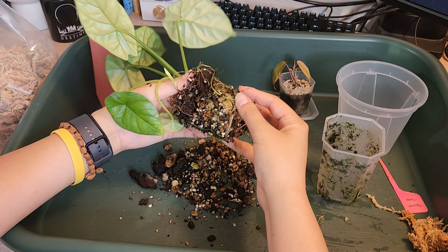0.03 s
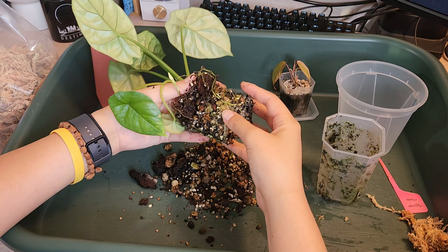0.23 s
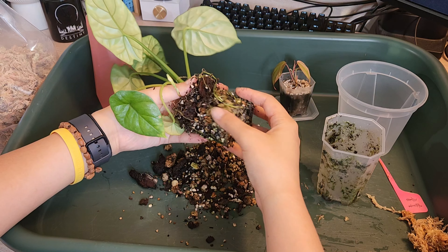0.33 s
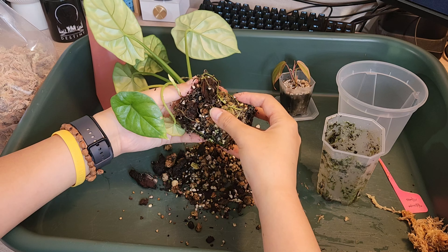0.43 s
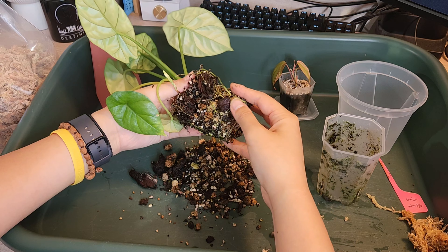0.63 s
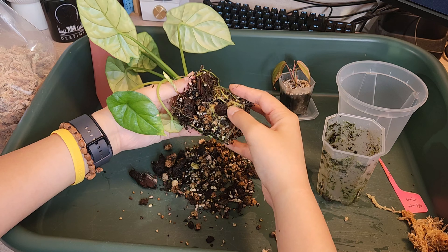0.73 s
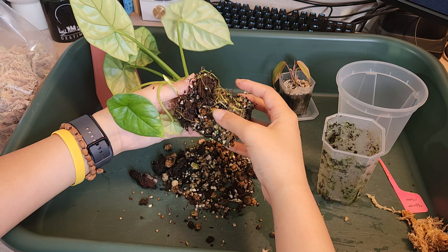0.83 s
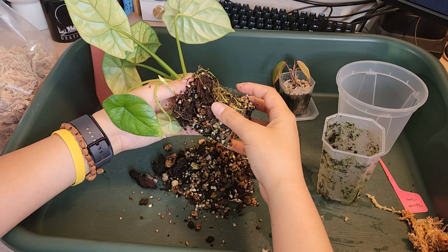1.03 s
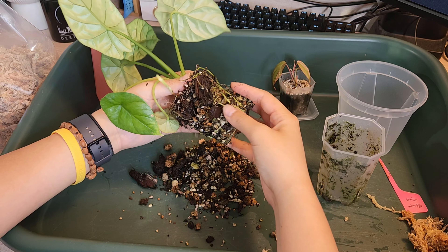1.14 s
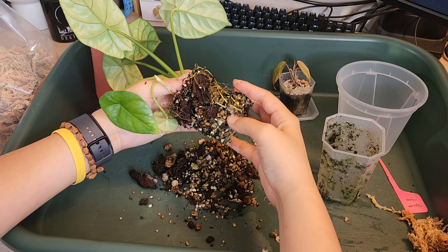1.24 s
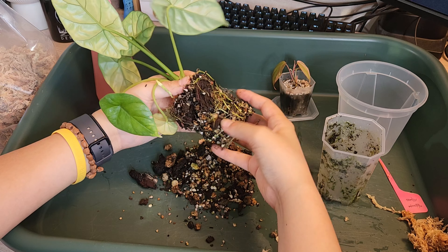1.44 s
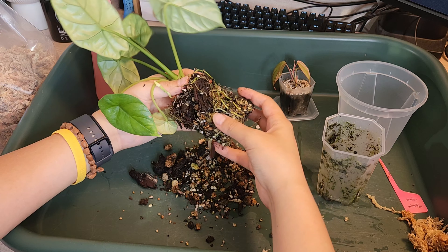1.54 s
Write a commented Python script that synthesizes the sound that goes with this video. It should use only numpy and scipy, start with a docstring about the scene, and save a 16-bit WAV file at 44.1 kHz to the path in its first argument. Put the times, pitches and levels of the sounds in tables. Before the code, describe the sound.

A quick spill of potting mix crumbs raps a plastic tub indoors, over faint room hum

```python
"""Loosening a root ball over a plastic tub.

Fingers loosen a houseplant's root ball: bits of bark and grit land as short noise bursts with pitches.
Decaying sines make the tub's walls ring and its bottom thump; decaying noise makes the small room's tail.
Grainy noise rustles as roots; shaped noise and sines give low handling, room rumble, hiss and hum."""
import sys
import numpy as np
from scipy import signal
from scipy.fft import rfft, irfft
from scipy.io import wavfile

SR = 44100
rng = np.random.default_rng(int(sys.argv[2]) if len(sys.argv) > 2 else 0)


def inscribe(sig):
    """Save sig as 16-bit PCM at rate SR to the path in sys.argv[1].

    A 1-D sig is mono; a 2-D sig holds one channel per row.
    Samples are clipped to [-1, 1] before scaling.
    """
    pcm = np.round(np.clip(np.atleast_2d(sig).T, -1, 1) * 32767)
    wavfile.write(sys.argv[1], SR, pcm.astype(np.int16))


N = 70560
TIME = np.arange(N) / SR

# bits of potting mix landing: (time [s], level [dB], extra body [dB], extra treble [dB], burst decay [s],
# own pitch [Hz], its peak [dB], second pitch [Hz], its peak [dB], left minus right [dB])
LANDINGS = [(0.1376, -35, -5, -1.5, 0.0043, 1487, 20, 6260, 3, 1.5),
            (0.1407, -40.5, 10, -7, 0.0042, 567, 14, 800, 6, 0.5),
            (0.1767, -25.5, -14.5, -8, .0034, 1540, 10, 5270, 5, 0.5),
            (0.2009, -28, -15, -4, 0.0052, 3330, 8.5, 1900, 11, 2.5),
            (0.234, -6.5, -16.5, 2, 0.0019, 1620, 14, 3870, 1.5, 2.5),
            (0.2371, -10.5, -6.5, -23, 0.0054, 1620, -16, 1230, 7, -2),
            (0.2524, -19, 8.5, -8, .0018, 1007, 5, 757, 3, -5),
            (0.2541, -10.5, 1.5, -2, 0.0029, 989, 10.5, 5317, 3, 0),
            (0.2581, -19, 3, 2, 0.0013, 962, 6.5, 1450, 6, -2),
            (0.2736, -2.5, -18.5, -6, .0016, 6200, 6, 1762, 7, -0.5),
            (0.2805, -22.5, 0, 10, .003, 1716, 11.5, 4180, 6, -1.5),
            (0.2891, -26.5, 3.5, 2, .005, 2072, 13.5, 1063, 5, -8),
            (0.3272, -12, -11.5, -14, 0.0051, 1530, 9.5, 3150, 2.5, 4.5),
            (0.3316, -28.5, -6, -14, 0.0071, 1625, 14, 2100, 14, -14),
            (0.3345, -24.5, 10.5, -24, 0.0043, 748, 4.5, 910, 3.5, -7),
            (0.3422, -44, 5, -24, 0.0045, 1690, 13, 1240, 14, -1),
            (0.3857, -14.5, -8.5, -12, 0.0044, 7260, 6.5, 1440, 6, 0.5),
            (0.498, -46.5, 11, -16, .006, 1400, 7, 940, 9, 1),
            (0.5088, -45.5, 9, -11, 0.014, 1250, 19, 1570, 11, -3),
            (0.522, -43, 6, 6, 0.0061, 14100, 13, 5500, -5, 1),
            (0.5365, -38, 3, -30, 0.016, 969, 4, 3800, 2, -1),
            (0.5651, -40.5, 3.5, -20, .008, 1550, 9, 1010, 5, -1),
            (0.593, -49, 5, -13, .006, 1480, 13, 2100, 10, 0),
            (0.616, -31, -3, -18, 0.0032, 1950, 5, 5600, 6, 0),
            (0.773, -60, -5, -1.5, .002, 4640, 12, 7500, 6.5, 6),
            (1.208, -64, -12, 14.5, .0026, 10290, 18, 7800, 8.5, 0.5),
            (1.3004, -48.5, -2.5, 5.5, 0.0032, 1940, 13, 600, 9.5, 7),
            (1.3026, -45.5, 1.5, 1.5, .005, 1896, 12.5, 1150, 9, -5),
            (1.3078, -38, -3, -5, .004, 1170, 10, 2005, 6, 4),
            (1.519, -56, 1.5, 12, 0.0055, 7000, 10, 4800, 4.5, 1.5),
            (1.526, -56, 31, -6.5, 0.0033, 1640, 10, 680, 10.5, 1.5),
            (1.530, -53, 25, -13.5, .005, 363, 12.5, 525, 11, 7)]
# left-right correlation of the noises: (frequency [Hz], correlation [-1..1])
LIKENESS_BY_HZ = [(50, 0.99), (160, 0.94), (380, 0.81), (950, 0.44), (1600, 0.23), (2400, 0.028),
                  (6000, 0.31)]
# the tub lies a little to the left: (frequency [Hz], left minus right [dB])
TUB_LEAN = [(100, -3), (450, 5.5), (770, 6.5), (1200, 2), (2700, -1), (4200, 1), (6400, 4.5), (9800, -2),
            (15000, 3)]


def from_db(db):
    """Decibels to amplitude gain."""
    return 10 ** (np.asarray(db) / 20)


def rms_one(x):
    """Scale to rms 1."""
    return x / np.sqrt(np.mean(x ** 2) + 1e-20)


def at_hz(points, hz):
    """Interpolate a table on a log-frequency axis."""
    f, value = np.transpose(points)
    return np.interp(np.log(np.maximum(hz, 1)), np.log(f), value)


def freqs(size):
    """Bin frequencies [Hz] of a real spectrum of size samples."""
    return np.arange(size // 2 + 1) * SR / size


def causal(db):
    """Minimum-phase response with these gains: nothing sounds early."""
    cepstrum = irfft(np.log(from_db(db)))
    half = len(cepstrum) // 2
    cepstrum[1:half] *= 2
    cepstrum[half + 1:] = 0
    return np.exp(rfft(cepstrum))


def stereo(pair, likeness):
    """Mix two unrelated signals into left and right with a given correlation."""
    c = np.clip(likeness, -1, 1)
    mid = np.sqrt((1 + c) / 2) * pair[0]
    side = np.sqrt((1 - c) / 2) * pair[1]
    return np.array([mid + side, mid - side])


def panned(db):
    """Left and right gains for a level difference, left minus right."""
    return from_db(np.array([[.5], [-.5]]) * db)


def ring(x, hz, t60_s):
    """Two-pole resonator: a unit click starts a decaying sine of height 1."""
    radius = np.exp(-np.log(1000) / (t60_s * SR))
    w = 2 * np.pi * hz / SR
    return signal.lfilter([0, np.sin(w)], [1, -2 * radius * np.cos(w), radius ** 2], x + 1e-18)


def resonance(hz, centre_hz):
    """Narrow peak of height 1 on a log-frequency axis."""
    width_octaves = 0.091
    return 1 / (1 + (np.log2((hz + 1) / centre_hz) / width_octaves) ** 2)


def add(out, start_s, sound):
    """Mix a sound into out at a time."""
    i = max(int(start_s * SR), 0)
    out[..., i:i + sound.shape[-1]] += sound[..., :max(N - i, 0)]


def background():
    """Steady room rumble and hiss as shaped stereo noise, plus a faint hum of sines."""
    # (frequency [Hz], relative density [dB per Hz])
    rumble_colour = [(20, -25), (50, -4), (90, -6.5), (140, -0.5), (200, -4), (300, -5.5), (450, -13.5),
                     (720, -23), (880, -21), (1050, -29.5), (1400, -30), (2200, -34.5), (3300, -47),
                     (5500, -46.5), (7800, -36), (10500, -48), (16000, -51)]
    # (frequency [Hz], left minus right [dB])
    rumble_lean = [(60, 2), (180, 1), (550, 6), (1650, 5), (5000, 9), (15000, 14)]
    # (frequency [Hz], rms level [dB])
    hum_tones = [(123.8, -61), (180, -67)]
    rumble_db = -53.5
    hz = freqs(N)
    spectrum = stereo(rfft(rng.standard_normal((2, N))), at_hz(LIKENESS_BY_HZ, hz))
    noise = irfft(spectrum * from_db(at_hz(rumble_colour, hz)) * panned(at_hz(rumble_lean, hz)))
    hum = 0
    for tone_hz, db in hum_tones:
        hum = hum + from_db(db) * np.sqrt(2) * np.sin(2 * np.pi * (tone_hz * TIME + rng.random()))
    return from_db(rumble_db) * rms_one(noise) + hum


def handling():
    """Shifting hands rumble softly: octave-band noise under a level curve."""
    # (time [s], level [dB])
    handling_level = [(0, -65.5), (.8, -72), (.89, -56.5), (1.0, -62.5), (1.11, -54.5), (1.18, -70),
                      (1.6, -63)]
    centre_hz = 93.3
    edges_hz = [centre_hz / np.sqrt(2), centre_hz * np.sqrt(2)]
    band = signal.butter(2, edges_hz, "band", fs=SR, output="sos")
    rumble = rms_one(signal.sosfilt(band, rng.standard_normal(N)))
    return rumble * from_db(np.interp(TIME, *np.transpose(handling_level)))


def roots():
    """Fingers rub the root ball: sparse one-sample grains crackle in a soft hiss."""
    # (time [s], level [dB])
    rubbing_level = [(0, -56.5), (.05, -66.5), (.2, -57.5), (.47, -68.5), (.52, -64.5), (.67, -59.5),
                     (.74, -70.5), (.95, -78), (1.05, -78.5), (1.1, -68), (1.27, -66.5), (1.42, -95.5),
                     (1.55, -67.5), (1.6, -73.5)]
    # (frequency [Hz], relative density [dB per Hz])
    rustle_colour = [(500, 8), (1500, -13), (3200, -8), (5000, 0.5), (7800, 6.5), (10000, 2.5),
                     (12500, 0.5), (16000, 2)]
    grains_per_s, grain_spread_db, grain_share = 500, 1, 0.18
    sizes = from_db(grain_spread_db * np.minimum(rng.exponential(1, N), 2))
    present = rng.random(N) < grains_per_s / SR
    grains = (rng.random((2, N)) - .5) * sizes * present
    hiss = rng.standard_normal((2, N))
    rub = grain_share * rms_one(grains) + (1 - grain_share) * hiss
    rustle = rms_one(irfft(rfft(rub) * causal(at_hz(rustle_colour, freqs(N)))))
    return rustle * from_db(np.interp(TIME, *np.transpose(rubbing_level)))


def room(x, band_count=12):
    """Diffuse room tail: noise bands, each with its own exponential decay."""
    # (frequency [Hz], level [dB])
    room_level = [(100, 0.5), (500, -3), (1500, -11), (4000, -5), (7000, -11), (11000, -12), (16000, -8.5)]
    # (frequency [Hz], t60 [s])
    room_decay = [(150, 0.31), (1000, 0.14), (4000, 0.09), (8000, 0.2), (16000, 0.13)]
    delay_s, build_s = 0.0078, 0.0013
    edges_hz = np.geomspace(80, 18000, band_count + 1)
    white = rng.standard_normal((2, 2, N))  # neighbouring bands use different noise
    build = 1 - np.exp(-np.maximum(TIME - delay_s, 0) / build_s)
    tail = 0
    for k, (low, high) in enumerate(zip(edges_hz, edges_hz[1:])):
        hz = np.sqrt(low * high)
        noise = stereo(white[k % 2], at_hz(LIKENESS_BY_HZ, hz))
        band = signal.sosfilt(signal.butter(2, [low, high], "band", fs=SR, output="sos"), noise)
        band = band * build * np.exp(-np.log(1000) * TIME / at_hz(room_decay, hz))
        width_gain = np.sqrt(2 * (high - low) / SR / N)
        tail = tail + from_db(at_hz(room_level, hz)) * rms_one(band) * width_gain
    return signal.fftconvolve(x, tail, axes=-1)[:, :N]


def bottom():
    """Soft pushes by weight set the tub's broad bottom ringing like a drum with little deep bass."""
    # (time [s], push level [dB])
    thumps = [(0.2356, -41), (0.256, -36), (0.282, -37.5), (0.33, -32), (0.5249, -41), (1.3015, -46),
              (1.5308, -29)]
    # (frequency [Hz], gain [dB], t60 [s])
    bottom_modes = [(154.5, 0.5, 0.24), (208.3, -11.5, .15), (366, -13, .1)]
    push_s, low_cut_hz = 0.003, 85
    push = np.hanning(int(push_s * SR) + 3)
    pushes = np.zeros(N)
    for start_s, db in thumps:
        add(pushes, start_s, -from_db(db) * push / push.sum())  # downward
    drum = sum(from_db(db) * ring(pushes, hz, t60_s) for hz, db, t60_s in bottom_modes)
    return signal.sosfilt(signal.butter(2, low_cut_hz, "high", fs=SR, output="sos"), drum)


def walls():
    """Each landing strikes the tub's wall modes, which ring on as decaying sines."""
    # (frequency [Hz], gain [dB])
    wall_modes = [(953, -35.5), (1011, -35.5), (1221, -34), (1415, -35), (1640, -36), (1743, -36),
                  (2067, -34.5), (2400, -35.5), (3285, -37.5), (3490, -35), (5030, -35), (5560, -35),
                  (6175, -35.5)]
    t60_s = 0.18
    start_s, db = np.transpose(LANDINGS)[:2]
    out = 0
    for hz, mode_db in wall_modes:
        strikes = np.zeros((2, N))
        for channel in strikes:
            jitter_s = rng.random(len(start_s)) / hz  # up to one period: random phase
            channel[((start_s + jitter_s) * SR).astype(int)] = from_db(db + mode_db)
        strikes = stereo(strikes, at_hz(LIKENESS_BY_HZ, hz))
        out = out + ring(strikes, hz, t60_s) * panned(at_hz(TUB_LEAN, hz))
    return out


def grit(size, count=7):
    """Fine grit scatters after a landing: grains, weaker when later, each rings at its own pitch."""
    level_db, delay_s, fade_db_per_s = -15.5, 0.018, 230
    low_hz, high_hz, cycles_to_60db = 1100, 6600, 10
    out, t = np.zeros((2, size)), np.arange(size) / SR
    delays, pitches = rng.gamma(2, 1, count), rng.random(count)
    phases = rng.random((count, 2, 1))
    for delay, pitch, phase in zip(delays, pitches, phases):
        late_s = min(delay_s * delay, t[-1] / 2)
        hz = low_hz * (high_hz / low_hz) ** pitch
        grain = np.sin(2 * np.pi * (hz * t + phase)) * np.exp(-np.log(1000) * t * hz / cycles_to_60db)
        gain = from_db(level_db - fade_db_per_s * late_s) * np.sqrt(2 * hz / SR / size)
        i = int(late_s * SR)
        out[:, i:] += gain * rms_one(grain)[:, :size - i]
    return out


def clatter(decay_s, size, passes=3):
    """Sharp, quickly dying stereo noise burst with a nearly even spectrum and unit energy."""
    rise_s = 0.0001
    t = np.arange(size) / SR
    envelope = (1 - np.exp(-t / rise_s)) * np.exp(-t / decay_s)
    noise = rfft(rng.standard_normal((2, size)))
    burst = irfft(stereo(noise, at_hz(LIKENESS_BY_HZ, freqs(size)))) * envelope
    for _ in range(passes):  # even out the spectrum, keep it short
        spectrum = rfft(burst)
        burst = irfft(spectrum / np.sqrt(np.abs(spectrum) + 1e-12)) * (t < 10 * decay_s)
    return rms_one(burst) / np.sqrt(size)


def drops(size=8192):
    """Bits crack on the plastic: two pitches each, duller or brighter by weight and hardness."""
    # (frequency [Hz], relative density [dB per Hz])
    crack_colour = [(60, -24), (200, -7), (400, -4), (620, -1), (970, 5), (1250, -0.5), (1700, 3.5),
                    (2200, 1), (4000, 0), (6000, 1.5), (8500, 1), (10000, -3), (12500, -1.5), (13800, -8),
                    (15500, -6)]
    crack_db, right_lag_s = 18.5, 0.00005
    body_low_hz, body_high_hz, treble_hz = 180, 1130, 6800
    out, hz = np.zeros((2, N)), freqs(size)
    body = hz ** 2 / (hz ** 2 + body_low_hz ** 2) / (1 + (hz / body_high_hz) ** 2)
    treble = hz ** 2 / (hz ** 2 + treble_hz ** 2)
    lag = np.exp(-2j * np.pi * hz * np.array([[0], [right_lag_s]]))
    for landing in LANDINGS:
        start_s, db, body_db, treble_db, decay_s, own_hz, own_db, second_hz, second_db, pan_db = landing
        pitches_db = own_db * resonance(hz, own_hz) + second_db * resonance(hz, second_hz)
        weight_db = body_db * body + treble_db * treble
        colour = causal(crack_db + db + at_hz(crack_colour, hz) + weight_db + pitches_db)
        contact = clatter(decay_s, size) + grit(size)
        sound = irfft(rfft(contact) * colour * lag * panned(pan_db + at_hz(TUB_LEAN, hz)))
        add(out, start_s, sound[:, :size * 3 // 4])  # drop the block's end
    return out


def scene(roots_pan_db=3):
    """Sum the background, hands, roots, tub and landings; only the landings feed the room tail."""
    cracks = drops()
    hands = handling() + roots() * panned(roots_pan_db)
    tub = bottom() + walls()
    return background() + hands + tub + room(cracks) + cracks


def record(dry):
    """Round the sharpest peaks by soft saturation, then cut the top steeply."""
    cutoff_hz = 15900
    rounded = np.tanh(dry / 1.1) * 1.1
    return signal.sosfilt(signal.ellip(10, .2, 70, cutoff_hz, fs=SR, output="sos"), rounded)


dry = scene()
out = record(dry)
inscribe(out)
```